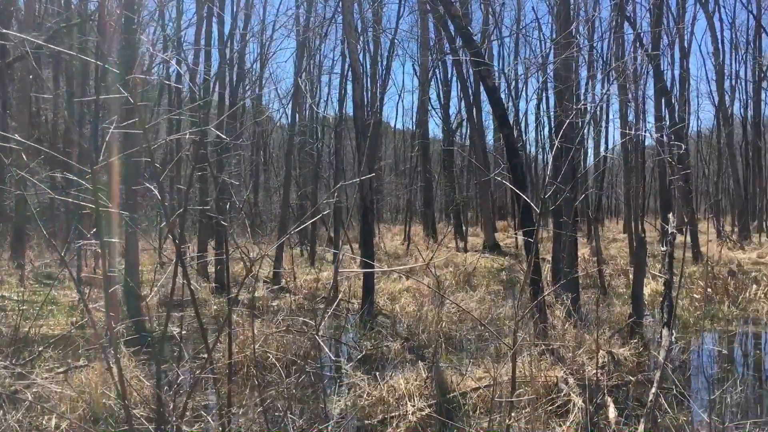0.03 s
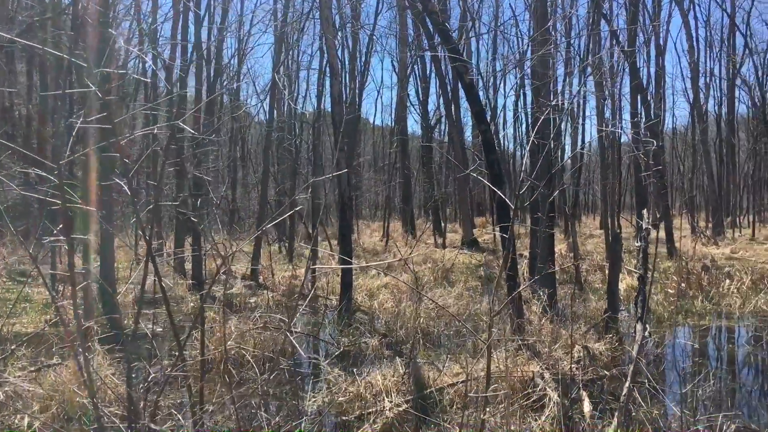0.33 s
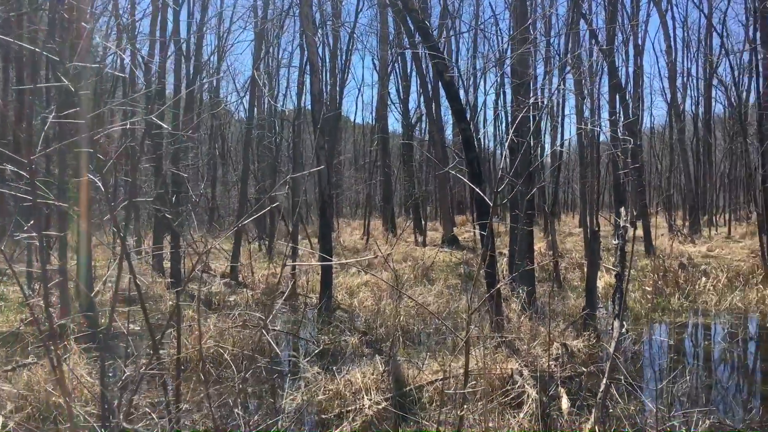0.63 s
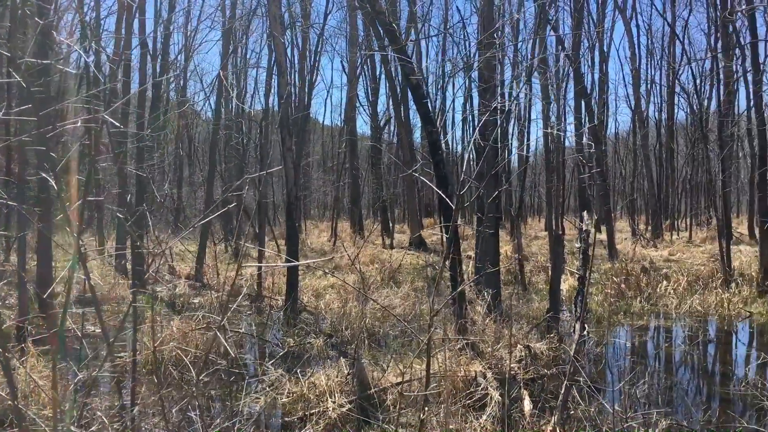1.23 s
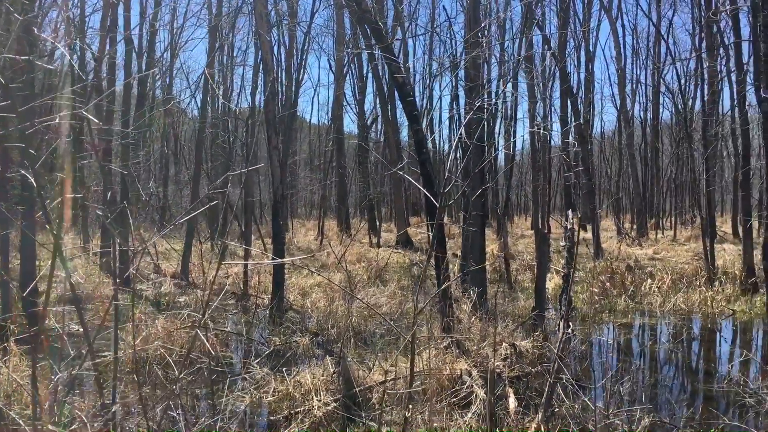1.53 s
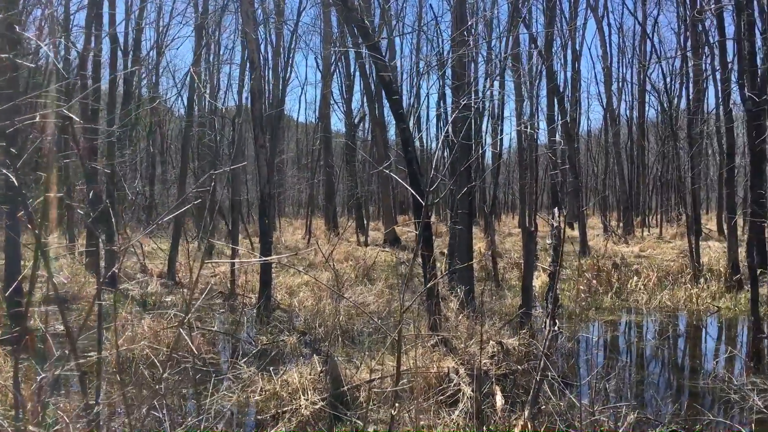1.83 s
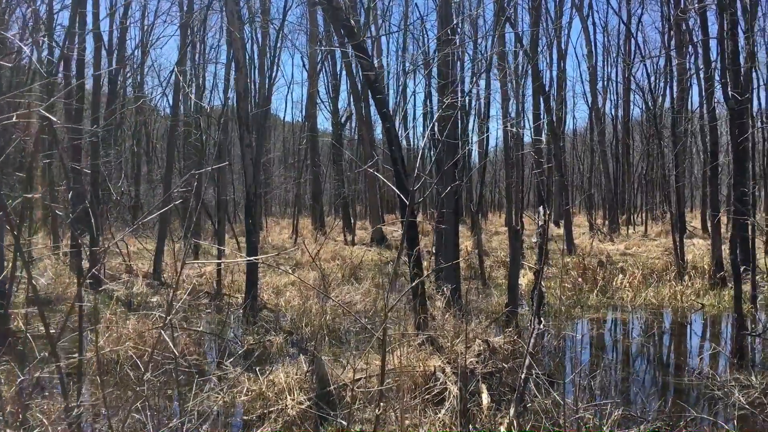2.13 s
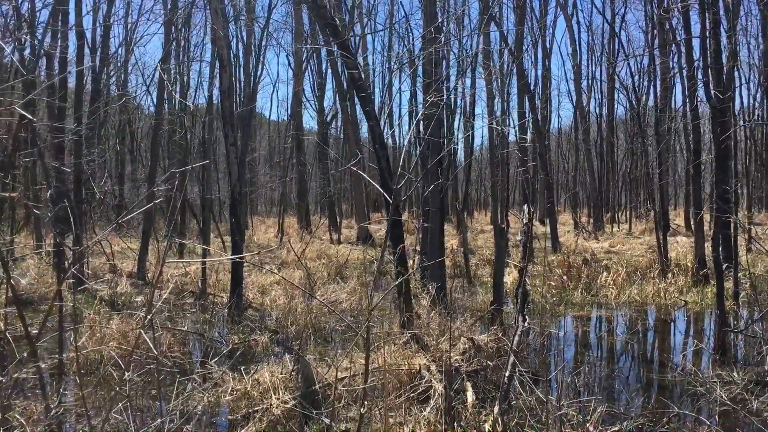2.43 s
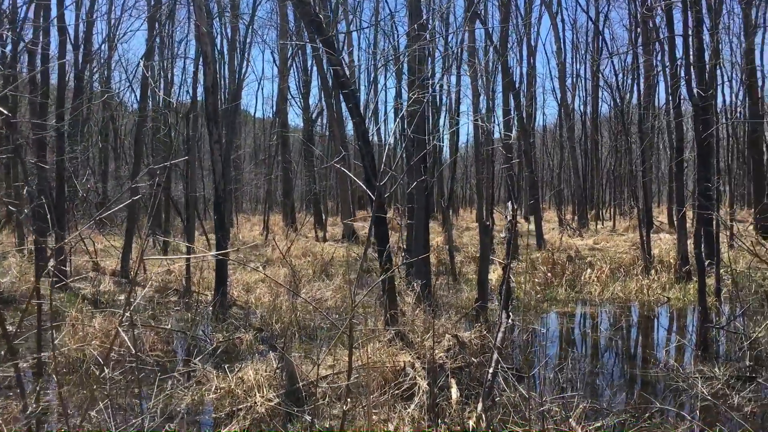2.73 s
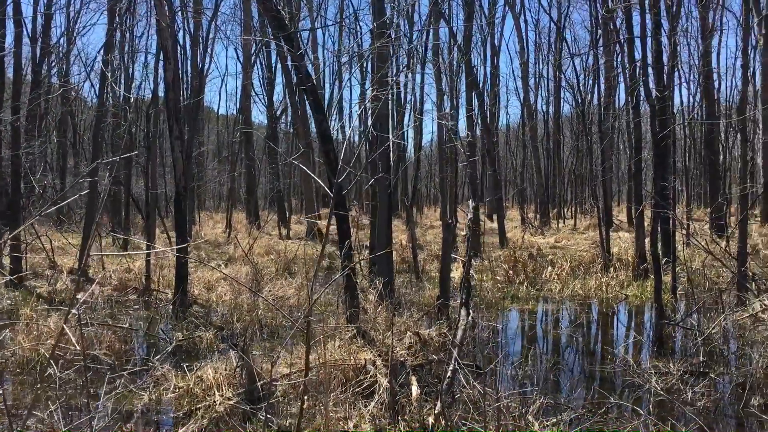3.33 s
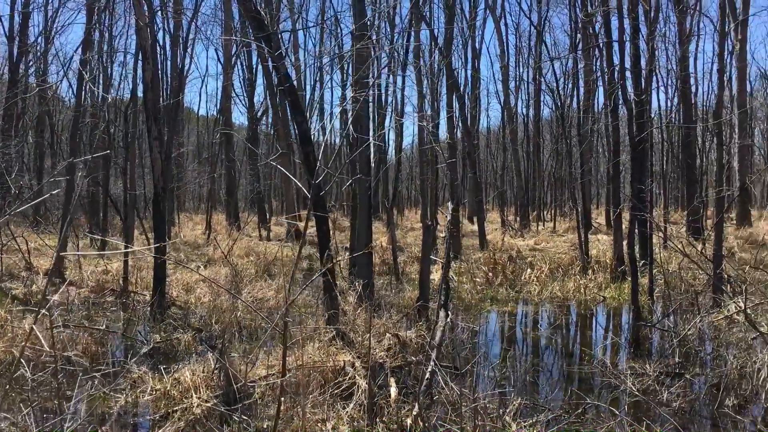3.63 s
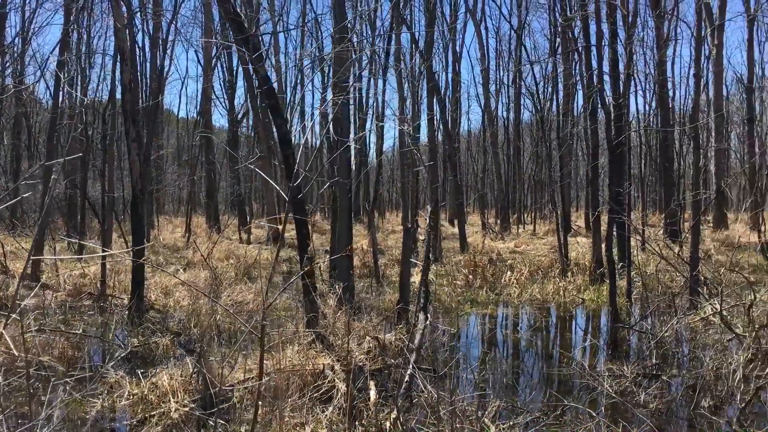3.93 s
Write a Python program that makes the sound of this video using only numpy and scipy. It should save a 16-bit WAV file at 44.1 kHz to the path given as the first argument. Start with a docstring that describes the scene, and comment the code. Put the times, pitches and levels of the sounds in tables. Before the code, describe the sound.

Chorus frogs call throughout a flooded wood, their near, overlapping runs of dry clicks swelling and rising in pitch over a distant chorus. Another frog clucks faintly, and light wind bumps the microphone midway and near the end.

```python
"""Chorus frogs call in a flooded wood. From the start, near callers overlap before a far chorus and a
soft hiss of air. Each call is a run of dry clicks, pulses of the larynx ringing the vocal sac, that
swells and mostly climbs in pitch; the trees return a faint echo. After half a second a wood frog
begins to cluck, its pulses filtered by its throat. Light wind bumps the microphone at 1.6 s and,
after the last cluck, hardest at 3.4 s and faintly at 3.7 s, while the chorus frogs call on."""
import sys
import numpy as np
from scipy import signal
from scipy.io import wavfile
from scipy.ndimage import uniform_filter1d

SR = 44100
rng = np.random.default_rng(int(sys.argv[2]) if len(sys.argv) > 2 else 0)


def output_pcm(signal):
    """Save a mono or channel-first signal as 16-bit PCM at the path in sys.argv[1].

    Samples are clipped to [-1, 1] before scaling.
    """
    pcm = np.clip(np.atleast_2d(signal).T, -1, 1) * 32767
    wavfile.write(sys.argv[1], SR, np.round(pcm).astype(np.int16))


N = 176400

# spectrum of the air and the marsh's murmur: (frequency [Hz], relative spectral density [dB])
AIR_SPECTRUM = [(25, -15.5), (50, 1.5), (75, 0.5), (190, -12.5), (400, -15.5), (850, -13.5), (1200, -17.5),
                (1750, -15.5), (2400, -22.5), (3300, -6), (4600, -31.5), (9500, -40.5), (15500, -33.5)]
AIR_DB, AIR_FLICKER_DB = -51.5, 1.5

# eddies at the microphone: (time [s], rise [s], fall [s], level [dB])
WIND_BUMPS = [(1.617, 0.038, 0.057, -31.5), (3.428, 0.014, 0.025, -21.5), (3.704, 0.024, 0.048, -44.5)]
BUMP_HZ, BUMP_SLOWING = 72, 0.61  # frequency at the crest; its fractional swing to either side
KNOCK_BAND_HZ, KNOCK_DB, KNOCK_S = (162, 320), -17, 0.0086

# reverberation of the wood: (frequency [Hz], time to decay by 60 dB [s])
WOOD_DECAY = [(500, 0.75), (2000, 0.42), (3500, 0.41), (8000, 0.19)]
NEAR_ECHO_DB, FAR_ECHO_DB, CLUCK_ECHO_DB = -9, -1.0, -7
TRUNKS_DB, TRUNKS_S = -12, 0.0046  # scales of the early reflections' strength and delay

# common drift of the far chorus: (time [s], level [dB], pitch [Hz])
FAR_CONTOUR = [(0, -40, 3376), (.35, -49, 3700), (.62, -59, 3384), (1.2, -47.5, 3615), (1.6, -45, 3263),
               (1.97, -42.5, 3562), (2.4, -50.5, 3298), (2.95, -52, 3460), (3.4, -38.5, 3396),
               (3.85, -56, 3695)]
FAR_CALLS_PER_S, FAR_SPREAD_DB, FAR_SPREAD_HZ = 9.7, 6, 150
FAR_FIRST_GAP_S, FAR_LAST_GAP_S, FAR_OVERTONES_DB, FAR_RING_S = .036, 0.081, -3, 0.0048

# wood frog clucks: (time [s], level [dB])
CLUCK_EVENTS = [(.55, -54), (.612, -51.5), (0.654, -43.5), (.855, -53.5), (0.898, -44), (0.937, -38.5),
                (1.191, -44.5), (1.235, -39.5), (1.539, -47.5), (1.958, -49.5), (2.24, -52), (3.195, -49.5)]
# throat resonances for a cluck at CLUCK_REF_DB: (frequency [Hz], bandwidth per stage [Hz], gain [dB])
THROAT_FORMANTS = [(922, 146, -5), (1470, 290, -4), (1960, 284, 4)]
CLUCK_HZ, CLUCK_ROUGHNESS, CLUCK_S = 159.1, 1, .025
CLUCK_REF_DB, OPENING_PER_DB = -40.5, .01  # louder clucks open the mouth: higher and brighter

# partials of a click: (frequency [multiple of the pitch], relative level [dB], ring [share of the main])
SAC_PARTIALS = [(0.498, -12.5, 0.68), (1.546, -19.5, 0.84), (1.996, -31.5, 1), (2.601, -40.5, .8),
                (4.1, -40.5, 0.89)]
LEAD_S, RISE_S = .005, 0.0011  # a click's crest lies LEAD_S into its buffer
OVERTONE_LEAD_S, OVERTONE_RISE_S = 0.0011, 0.0007
SAG_HZ_PER_S = 14100  # the pitch drops through each click
RING_REF_HZ, RING_POWER = 3035, 1.55  # higher clicks are shorter
SNAP_DB, SNAP_S = -37, 0.0044  # broadband onset of a click

# near calls, levels relative: (first pitch [Hz], last pitch [Hz], first level [dB], knee level [dB],
# last level [dB], overtone gain [dB], ring at RING_REF_HZ [s], click times [s])
NEAR_CALLS = [ (3530, 3530, -40, -26, -30, -8.5, 0.0033, [.035, .081, .134, .190, .254, .320, .389, .457, .517]),
              (3457, 3724, -26.5, -23.5, -27, -5, 0.0043, [.060, .127, .196, .263, .331, .379]),
              (3138, 3790, -32.5, -22.5, -27.5, -4, 0.0041, [0.311, 0.35, 0.394, 0.435, .480, 0.526, .575, 0.625, 0.678, .734, .793, .855, .921, .993, 1.065, 1.140, 1.214, 1.284, 1.337]),
              (3487, 4170, -37.5, -24, -33, -21.5, 0.0038, [0.781, .821, .860, .903, .947, .994, 1.043, 1.095, 1.153, 1.215, 1.278, 1.342, 1.407, 1.449]),
              (2936, 3490, -39, -24, -23.5, -7.5, 0.0043, [1.082, 1.12, 1.166, 1.209, 1.264, 1.309, 1.359, 1.41, 1.463, 1.52, 1.577, 1.637, 1.703, 1.77, 1.84, 1.919, 2.005, 2.093, 2.173]),
              (3210, 3760, -30, -23, -27, -5, 0.0037, [1.528, 1.591, 1.658, 1.729, 1.801, 1.878, 1.955, 2.034, 2.101]),
              (3363, 3685, -39, -23.5, -25.5, -6.5, 0.0039, [1.573, 1.625, 1.681, 1.741, 1.815, 1.874, 1.941, 2.010, 2.061]),
              (3126, 3800, -35, -23, -25.5, -5, 0.0038, [2.418, 2.456, 2.499, 2.543, 2.586, 2.634, 2.682, 2.733, 2.786, 2.842, 2.902, 2.963, 3.030, 3.100, 3.169, 3.243, 3.317, 3.387, 3.441]),
              (3730, 4174, -32.5, -30, -38.5, -14, 0.005, [2.713, 2.759, 2.809, 2.863, 2.92, 2.98, 3.042, 3.104, 3.171, 3.217]),
              (3012, 3780, -40.5, -25, -28.5, -4.5, 0.0056, [3.054, 3.095, 3.127, 3.190, 3.264, 3.317, 3.368, 3.427, 3.489, 3.553, 3.623, 3.69, 3.758, 3.813]),
              (3007, 3035, -46.5, -33, -27.5, -13, 0.0048, [3.583, 3.622, 3.667, 3.707, 3.757, 3.807, 3.858, 3.913, 3.969])]
KNEE_AT, SWELL_BEND, PITCH_BEND = 0.84, 1.59, 0.94  # share of the call; exponents of swell and climb
NEAR_GAIN_DB = -5.5


def amp(db):
    """Amplitude ratio of a level in decibels."""
    return 10 ** (np.asarray(db) / 20)


def unit(x):
    """Normalisation to an rms of 1."""
    return x / np.sqrt(np.mean(x ** 2) + 1e-20)


def at_frequency(points, hz):
    """Interpolation on a logarithmic frequency axis."""
    f, value = np.transpose(points)
    return np.interp(np.log(hz + 1), np.log(f), value)


def add(mix, s, sound):
    """Linear superposition: a sound joins the mix at time s."""
    at = round(s * SR)
    sound = sound[max(-at, 0):]
    part = mix[max(at, 0):][:len(sound)]
    part += sound[:len(part)]


def swell(t, rise, fall):
    """Asymmetric Gaussian envelope with its crest at t = 0."""
    return np.exp(-(t / np.where(t < 0, rise, fall)) ** 2)


def air():
    """Spectrally shaped noise: low rumble and soft hiss, flickering in patches of time and frequency."""
    hz, _, spectrum = signal.stft(rng.standard_normal(N), SR, nperseg=2048)
    patches = uniform_filter1d(rng.standard_normal(spectrum.shape), size=12, axis=0)
    patches = unit(uniform_filter1d(patches, size=4, axis=1))
    spectrum *= amp(at_frequency(AIR_SPECTRUM, hz)[:, None] + AIR_FLICKER_DB * patches)
    return amp(AIR_DB) * unit(signal.istft(spectrum, SR, nperseg=2048)[1][:N])


def wind():
    """Turbulent pressure: each eddy strikes the microphone with a dull knock and a few slowing swings."""
    out, t = np.zeros(N), np.arange(N) / SR
    band = signal.butter(2, KNOCK_BAND_HZ, "band", fs=SR, output="sos")
    for s, rise, fall, db in WIND_BUMPS:
        hz = BUMP_HZ * (1 - BUMP_SLOWING * np.tanh((t - s) / rise))
        swings = swell(t - s, rise, fall) * np.sin(2 * np.pi * (np.cumsum(hz) / SR + rng.random()))
        noise = unit(signal.sosfilt(band, rng.standard_normal(N)))
        knock = swell(t - s + KNOCK_S, rise / 2, KNOCK_S) * noise
        out += amp(db) * (swings + amp(KNOCK_DB) * knock)
    return out


def wood_echo(x):
    """Diffuse reverberation: sound scattered by the trees decays exponentially, the treble fastest."""
    hz, t, spectrum = signal.stft(rng.standard_normal(SR), SR, nperseg=256)
    decay = amp(-60 * t / at_frequency(WOOD_DECAY, hz)[:, None])
    tail = signal.istft(spectrum * decay, SR, nperseg=256)[1]
    call_band = signal.butter(2, [2500, 4500], "band", fs=SR, output="sos")
    tail /= np.linalg.norm(signal.sosfilt(call_band, tail)) * np.sqrt(SR / 4000)  # unit gain in that band
    return signal.fftconvolve(x, tail)[:N]


def far_frogs():
    """Incoherent summation: many slowing click trains start at random and blur in the wood."""
    out = np.zeros(N)
    times, level_db, pitch_hz = np.transpose(FAR_CONTOUR)
    for start in np.arange(-1, N / SR, 1 / FAR_CALLS_PER_S):
        gaps = np.linspace(FAR_FIRST_GAP_S, FAR_LAST_GAP_S, 18) * rng.uniform(.85, 1.15)
        detune_hz = FAR_SPREAD_HZ * rng.standard_normal()
        gain = amp(FAR_SPREAD_DB * rng.standard_normal())
        for s in start + rng.random() / FAR_CALLS_PER_S + np.cumsum(gaps):
            hz = np.interp(s, times, pitch_hz) + detune_hz
            add(out, s, gain * sac_click(hz, FAR_OVERTONES_DB, FAR_RING_S))
    chorus = unit(out + amp(FAR_ECHO_DB) * wood_echo(out))
    return chorus * amp(np.interp(np.arange(N) / SR, times, level_db))


def wood_frog():
    """Source and filter: short, rough pulse trains excite the resonances of the throat."""
    out, t = np.zeros(N), np.arange(4096) / SR
    envelope = np.sin(np.pi * np.minimum(t / CLUCK_S, 1))
    for s, db in CLUCK_EVENTS:
        mouth = 1 + OPENING_PER_DB * (db - CLUCK_REF_DB)
        bright_db = (db - CLUCK_REF_DB) / 2
        pulses = np.diff(np.floor(CLUCK_HZ * mouth * t + rng.random()), prepend=0)
        drive = (unit(pulses) + CLUCK_ROUGHNESS * rng.standard_normal(len(t))) * envelope
        voice = 0
        for k, (hz, width, peak_db) in enumerate(THROAT_FORMANTS):
            b, a = signal.iirpeak(hz * mouth, hz / width, SR)
            formant = signal.lfilter(b, a, signal.lfilter(b, a, drive))
            voice = voice + amp(peak_db + bright_db * (k > 0)) * formant
        add(out, s, amp(db) * unit(voice) * np.sqrt(CLUCK_S / t[-1]))
    return out


def sac_click(hz, overtones_db, ring_s):
    """Impulse excitation: one pulse of the larynx rings the vocal sac, overtones first."""
    t = np.arange(1024) / SR - LEAD_S
    early = t + OVERTONE_LEAD_S
    phase = 2 * np.pi * np.cumsum(hz - SAG_HZ_PER_S * t) / SR
    ring = ring_s * (RING_REF_HZ / hz) ** RING_POWER
    out = swell(t, RISE_S, ring) * np.sin(phase)
    for ratio, db, share in SAC_PARTIALS:
        colour_db = overtones_db if ratio > 1 else overtones_db / 2
        partial = np.sin(ratio * phase + 2 * np.pi * rng.random())
        out += amp(db + colour_db) * swell(early, OVERTONE_RISE_S, ring * share) * partial
    snap = swell(early, OVERTONE_RISE_S, SNAP_S) * rng.standard_normal(len(t))
    out += amp(SNAP_DB + overtones_db) * snap
    direct = out.copy()
    # early reflections from grass and trunks
    for delay, size in zip(rng.uniform(0.4633, 2.3, size=3), rng.standard_normal(size=3)):
        add(out, TRUNKS_S * delay, amp(TRUNKS_DB) * size / 2 * direct)
    return 2 * out


def near_frogs():
    """Modulated pulse trains: each call swells to a knee; most climb in pitch and ease off at the end."""
    out = np.zeros(N)
    for first_hz, last_hz, first_db, knee_db, last_db, overtones_db, ring_s, times in NEAR_CALLS:
        for s, progress in zip(times, np.linspace(0, 1, len(times))):
            before = max(1 - progress / KNEE_AT, 0) ** SWELL_BEND
            after = max((progress - KNEE_AT) / (1 - KNEE_AT), 0) ** SWELL_BEND
            db = knee_db + (first_db - knee_db) * before + (last_db - knee_db) * after
            hz = first_hz + (last_hz - first_hz) * progress ** PITCH_BEND
            add(out, s - LEAD_S, amp(db + NEAR_GAIN_DB) * sac_click(hz, overtones_db, ring_s))
    return out


def scene():
    """Superposition at one microphone: frogs near and far, their echo, wind and air."""
    near, clucks = near_frogs(), wood_frog()
    echo = wood_echo(amp(NEAR_ECHO_DB) * near + amp(CLUCK_ECHO_DB) * clucks)
    return (near + clucks + echo + far_frogs() + wind() + air())[None]


def record(dry):
    """Band limiting: a linear-phase low-pass filter removes the highest treble."""
    lowpass = signal.firwin(511, cutoff=15950, window=("kaiser", 9), fs=SR)
    return signal.oaconvolve(dry, lowpass[None], "same")


dry = scene()
out = record(dry)
output_pcm(out)
```